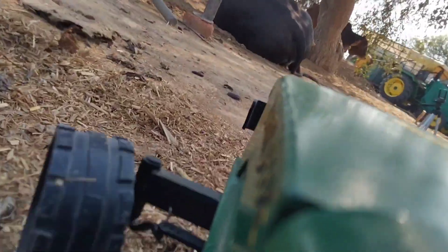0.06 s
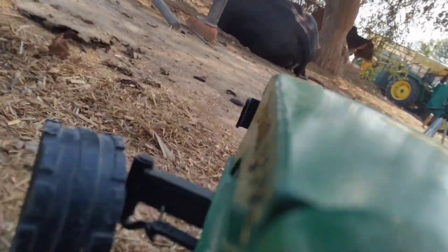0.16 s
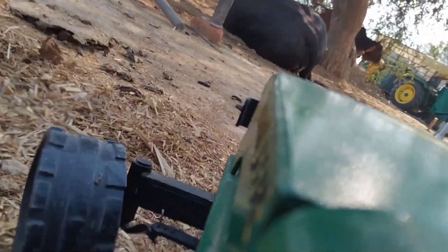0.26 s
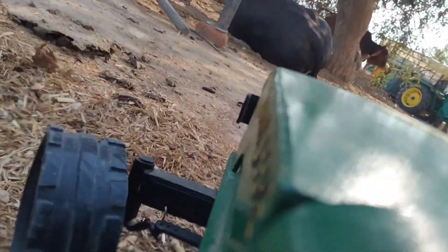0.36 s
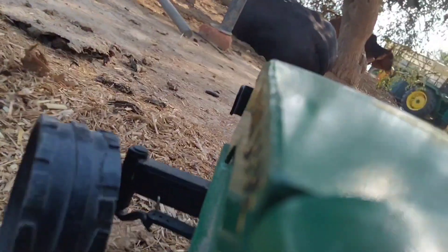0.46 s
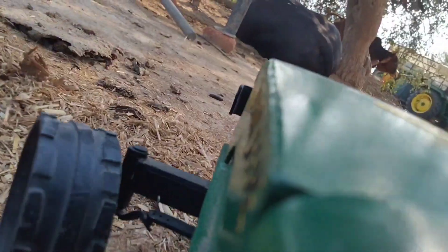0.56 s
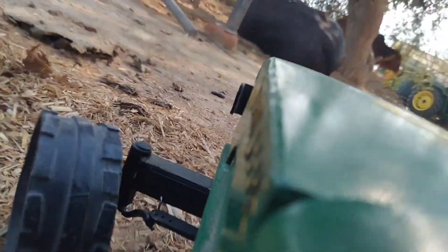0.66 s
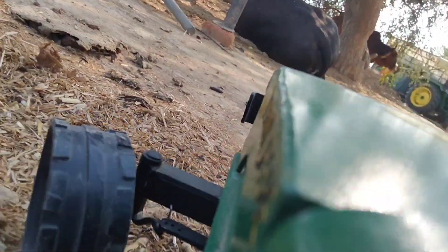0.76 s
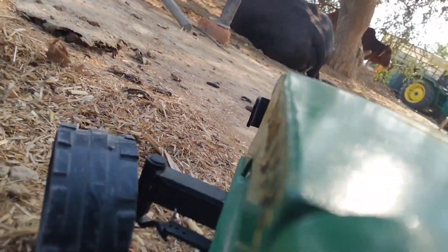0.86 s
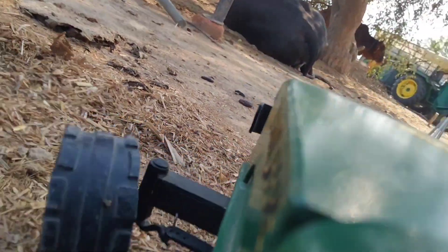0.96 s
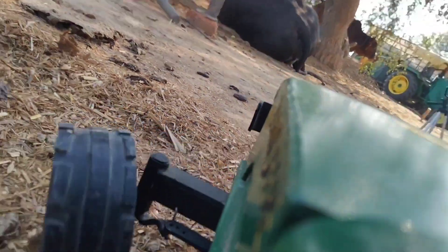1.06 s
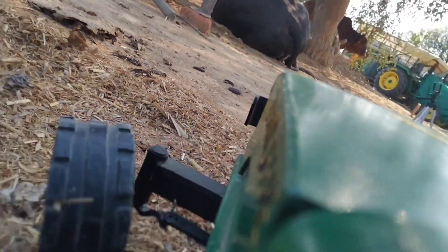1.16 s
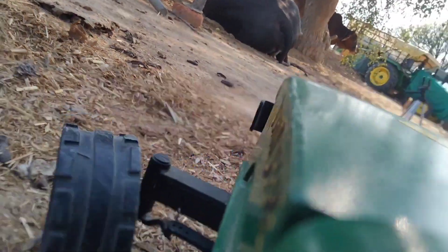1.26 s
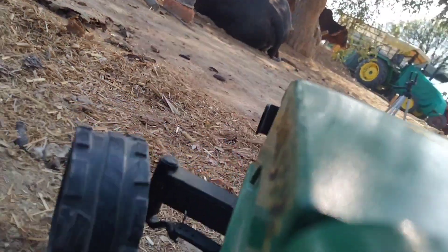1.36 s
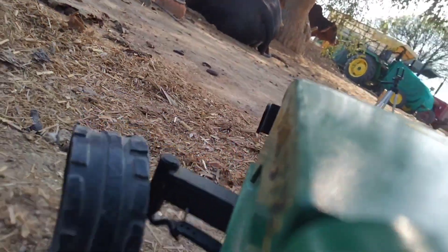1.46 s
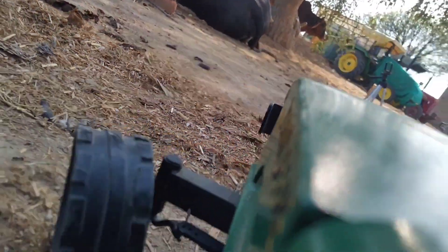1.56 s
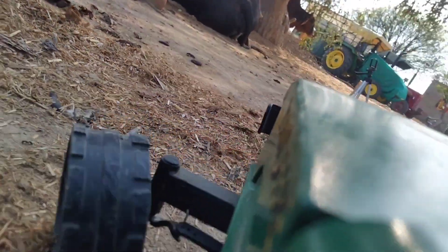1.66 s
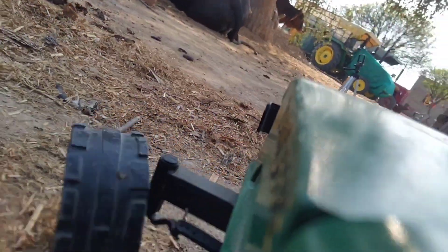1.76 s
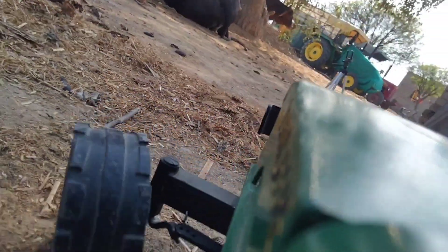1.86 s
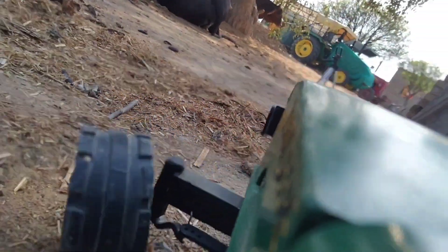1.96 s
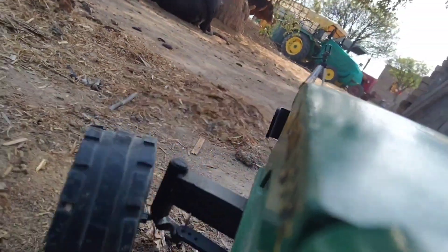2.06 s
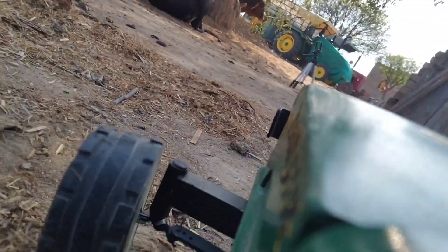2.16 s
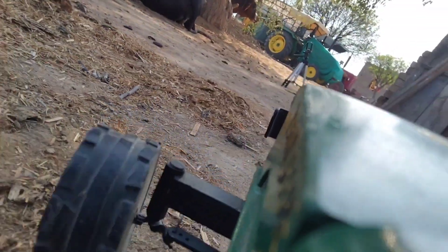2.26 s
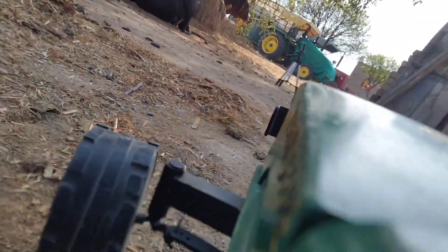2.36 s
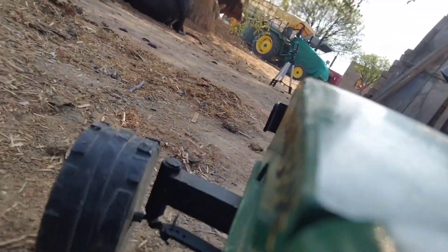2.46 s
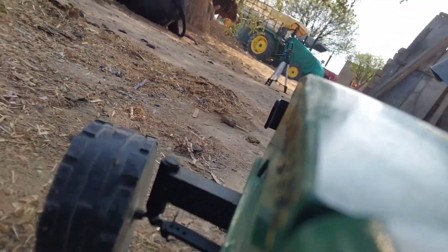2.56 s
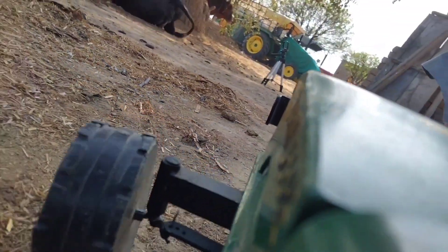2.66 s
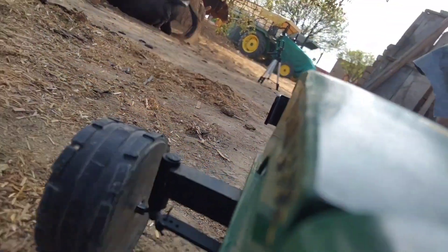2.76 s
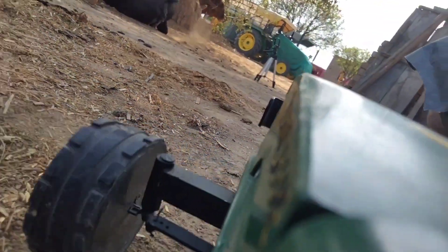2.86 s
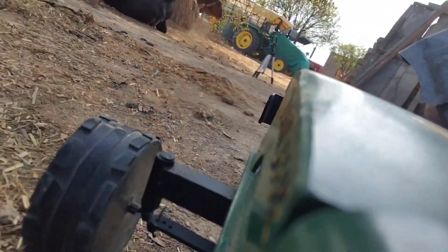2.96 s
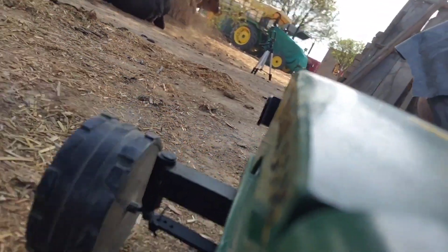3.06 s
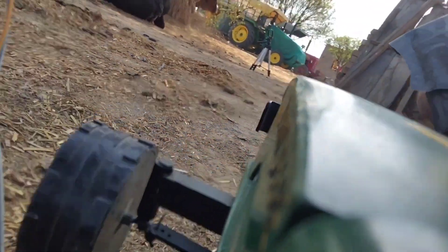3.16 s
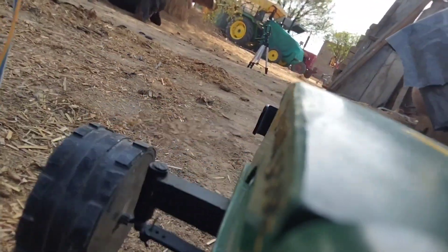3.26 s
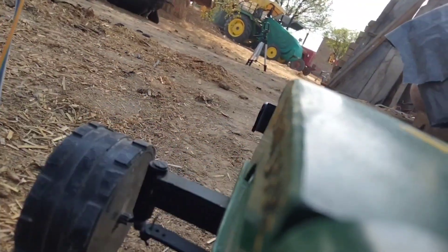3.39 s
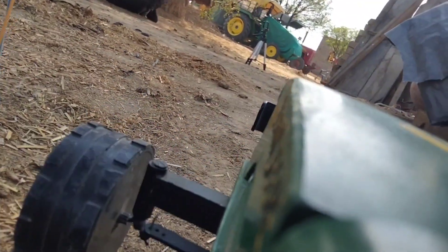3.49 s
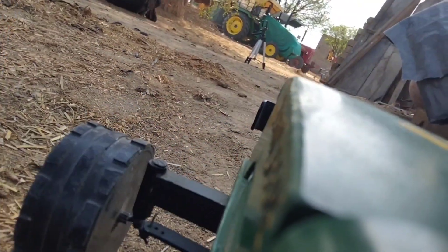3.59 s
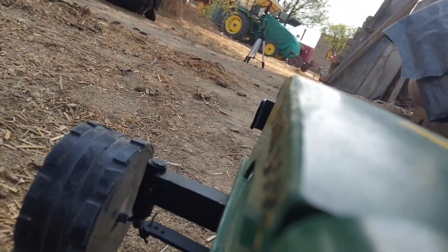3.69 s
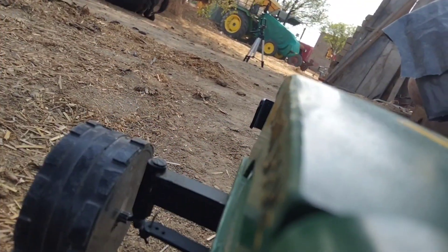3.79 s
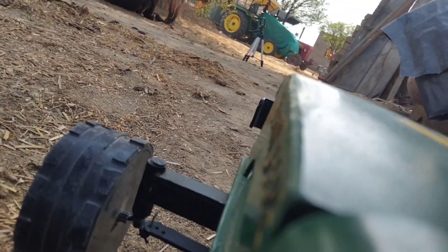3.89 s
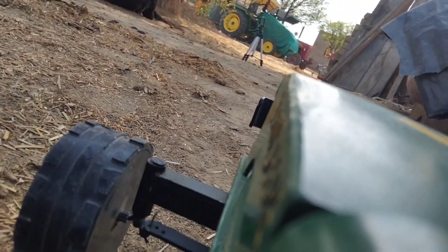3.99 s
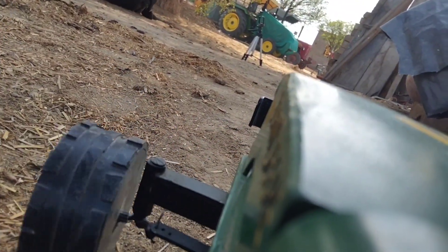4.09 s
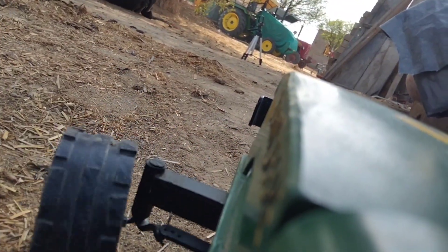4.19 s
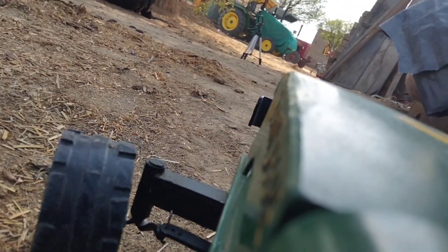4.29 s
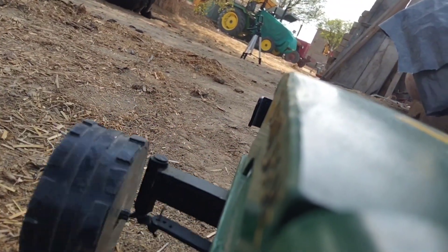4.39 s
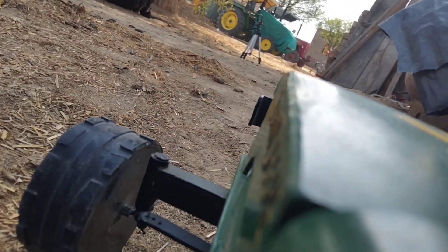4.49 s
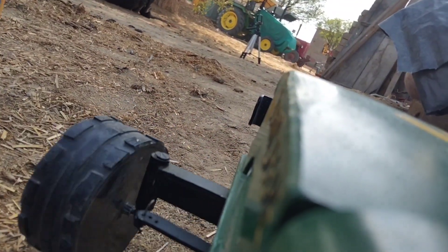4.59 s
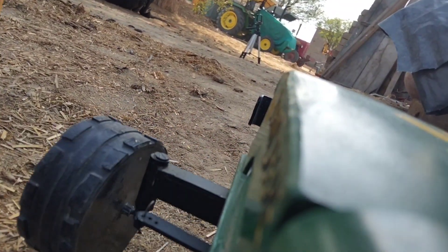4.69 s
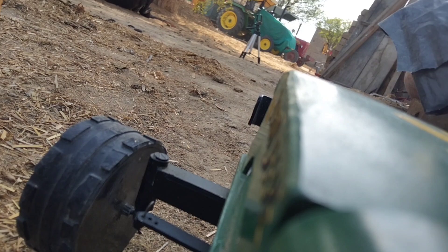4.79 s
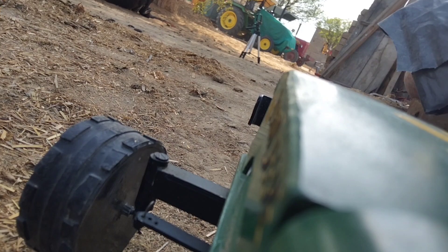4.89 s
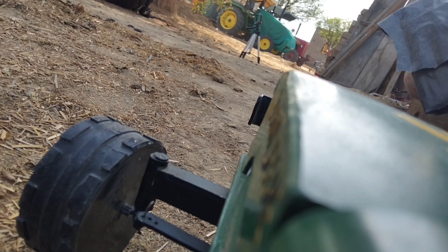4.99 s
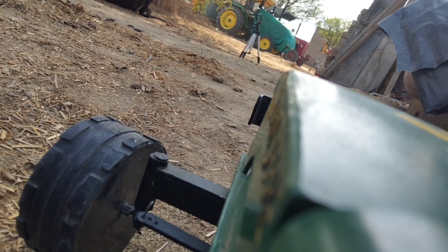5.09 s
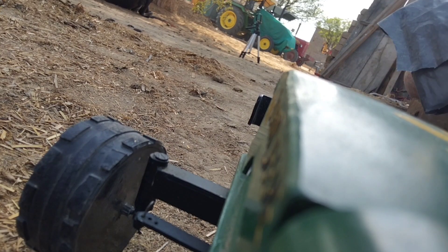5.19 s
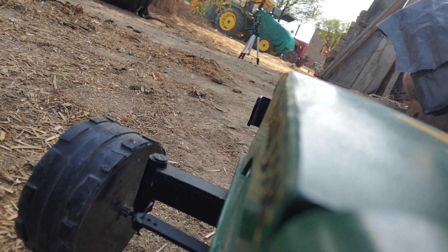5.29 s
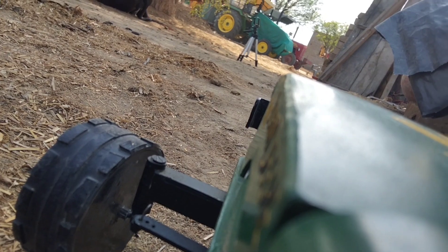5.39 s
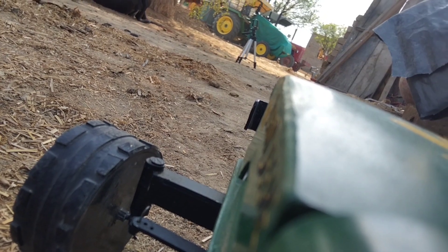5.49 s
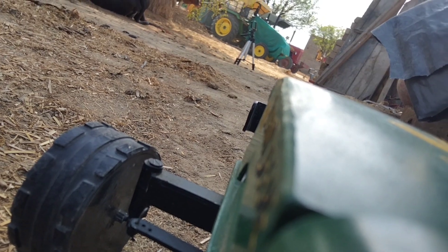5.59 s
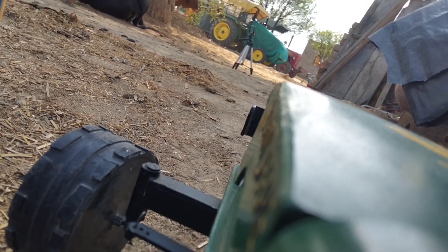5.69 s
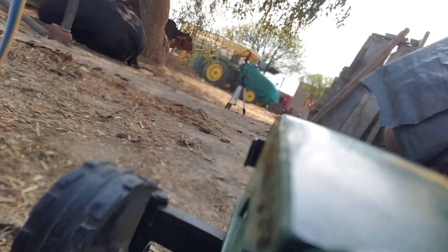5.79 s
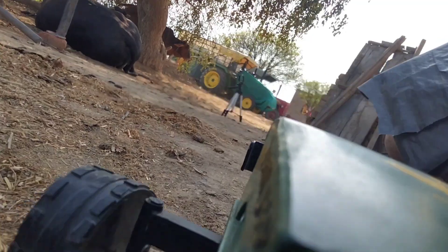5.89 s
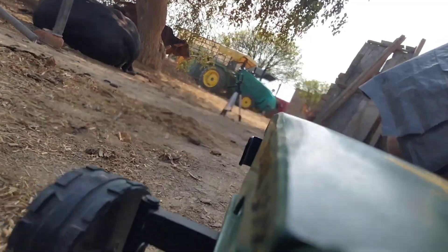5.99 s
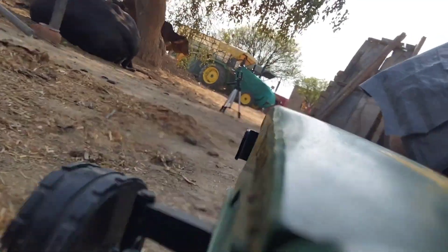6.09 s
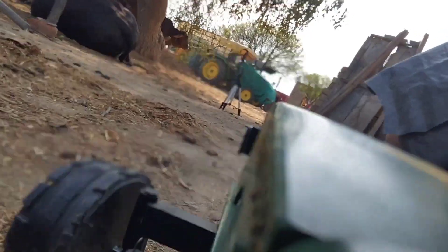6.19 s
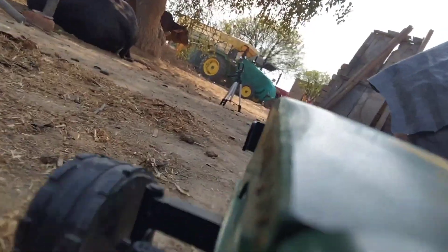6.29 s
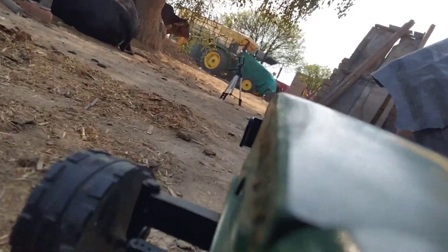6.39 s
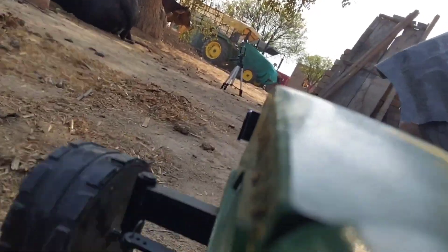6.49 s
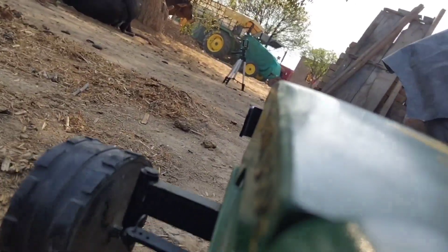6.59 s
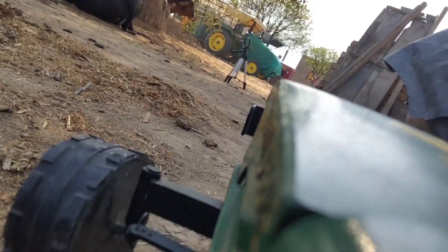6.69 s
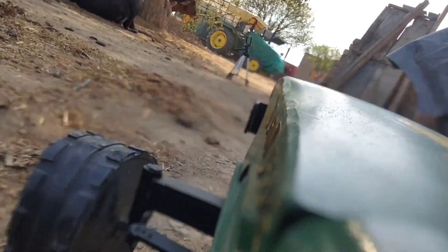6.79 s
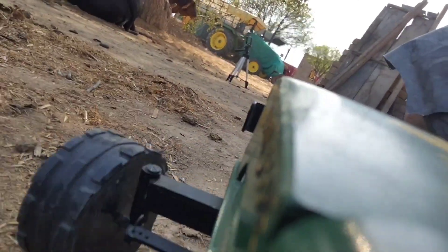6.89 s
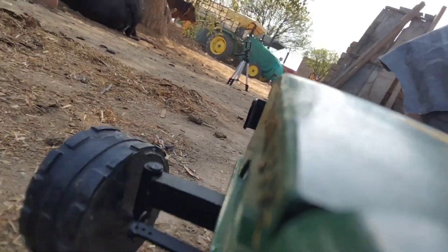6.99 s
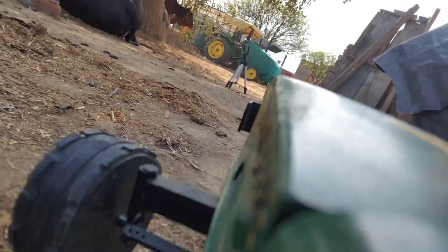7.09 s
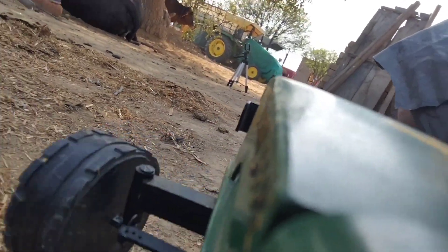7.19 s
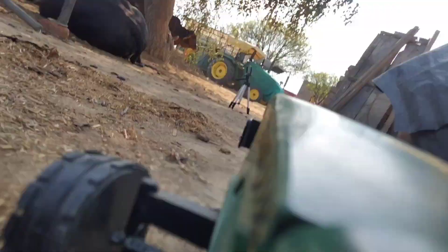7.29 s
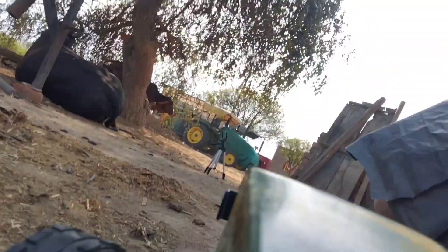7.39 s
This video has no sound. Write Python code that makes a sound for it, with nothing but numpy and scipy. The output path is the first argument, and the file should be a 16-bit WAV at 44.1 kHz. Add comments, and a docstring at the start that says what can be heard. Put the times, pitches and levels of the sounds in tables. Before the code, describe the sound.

Close up, a toy tractor's plastic gears whine, stop and start again, between switch clicks and the thin rasp of its steering motor.

```python
"""A toy tractor drives about a quiet farmyard with a phone riding on it. Its drive motor whines and
grinds through a plastic gearbox as it pulls, coasts and reverses. The brushes of a small steering
motor rasp in short strokes and one long one. Relays (electric switches) click at starts and stops.
In a pause, far birds chirp and something creaks once over the soft hush of the air."""
import sys
import numpy as np
from scipy.fft import rfft, irfft, next_fast_len
from scipy.io import wavfile
from scipy.ndimage import uniform_filter1d

SR = 44100
rng = np.random.default_rng(int(sys.argv[2]) if len(sys.argv) > 2 else 0)


def materialize(psi):
    """Save the field psi as 16-bit PCM at rate SR to the path in sys.argv[1].

    A 1-D psi becomes a single channel; in a 2-D psi each row is a channel.
    """
    bounded = np.clip(np.atleast_2d(psi).T, -1, 1)
    quanta = np.round(bounded * 32767).astype(np.int16)
    wavfile.write(sys.argv[1], SR, quanta)


N = 328545

# Drive motor, one list a run: t/s, shaft speed/(turns per s), load on the wheels (0-1)
DRIVE_MOTION = [
    [(0.0, 281, 1), (0.152, 284, 0.97), (0.19, 265, 0.6), (0.334, 288, 0.88), (0.44, 280, 0.9),
     (.5, 200, 0.2), (.59, 160, 0)],
    [(0.7, 227, 0.42), (.76, 243, 0), (0.85, 278, 0), (0.99, 268.3, 0), (1.0, 281, 0.49), (1.138, 272, 0),
     (1.19, 270, 0), (1.205, 284, 0.6), (1.355, 284, 0.7), (1.52, 275, 0.43), (1.555, 280, 0.7),
     (1.756, 277.5, 0.35), (2.04, 284, 0.4), (2.28, 287, 0.7)],
    [(2.31, 293, 1), (2.898, 307, 0.99), (3.05, 283, 1), (3.16, 211, 0.42)],
    [(5.82, 215, 0.6), (5.862, 266, 0.9), (6.03, 288, 1), (6.085, 266, 0.95), (6.2, 272, 1), (6.35, 288, 1),
     (6.43, 284, 0.7), (6.52, 279, 0.6)],
    [(6.88, 225, 0.1), (6.978, 272, 0.05), (7.0, 290.5, 0.92), (7.094, 305, 0.77), (7.13, 294.7, 0.44),
     (7.162, 250, 0.8), (7.246, 209, .6), (7.27, 233, 0.94), (7.34, 185, 1)],
    [(7.37, 190, 0.8), (7.45, 224, 0.68)],
]
# Backing up: from t/s, to t/s
REVERSING = [(2.29, 3.1), (6.995, 7.14)]
# Runs: power on t/s, power off t/s, wheels stop t/s, base level/dB of first grind, last grind, whine
DRIVE_RUNS = [(-.1, .46, .68, -36, -33, -31), (.688, 2.284, 2.3, -36.5, -35.5, -33),
              (2.308, 3.04, 3.38, -37.5, -38, -36.5), (5.793, 6.525, 6.753, -34.5, -33.5, -31.5),
              (6.858, 7.135, 7.4, -32.5, -40, -35), (7.358, 7.6, 8, -43, -20.5, -34)]
# The gears catch as the tractor lurches: t/s, level/dB of grind, whine and rumble, half length/s
LURCHES = [(0.172, -46.5, -47.5, -38.5, 0.019), (0.518, -42.5, -36, -45.5, 0.017),
           (0.56, -49, -36.5, -44.5, 0.013), (3.13, -45.5, -66, -44, 0.052),
           (3.188, -33.5, -35.5, -38.5, 0.0078), (3.228, -35.5, -44, -41, 0.02886),
           (3.281, -42.5, -37, -37, 0.014), (3.322, -51.5, -58.5, -42, 0.023),
           (3.396, -92, -82, -67, 0.0078), (5.823, -44.5, -53.5, -34.5, .02),
           (6.54, -33, -41, -45.5, 0.018), (6.643, -48.5, -40, -45.5, 0.014),
           (6.709, -56, -57.5, -48.5, .012), (7.204, -37.5, -35.5, -41, 0.041),
           (7.316, -43.5, -42.5, -48, 0.037), (7.386, -46, -60.5, -36, 0.014)]
# The gears go slack and the whine drops out: t/s, depth/dB, half length/s
GEAR_SLACK = [(2.381, 10, 0.006), (2.435, 13, 0.0089), (2.593, 11.5, 0.015), (2.63, 8, 0.012),
              (2.732, 19, 0.014), (2.82, 17.5, 0.017), (2.872, 14, 0.015), (0.336, 9.5, 0.0096)]
# Whine tones, or "orders": multiple of the shaft speed, forward level/dB, reverse level/dB
SHAFT_ORDERS = [(1.5, -13, -4.5), (3, -4.5, 2.5), (4, -10, -5.5), (6, -4, -6.5), (7, -4.5, -9.5),
                (8, -9, -6), (9, -1, -7), (12, 16, -11)]
# Rough bands of noise going forward: multiple of the shaft speed, level/dB over the whine
BUZZ_BANDS = [(7, -9), (9, -12), (12, -7), (15, -9), (18, -12)]
# Where the gearbox shell rings: f/Hz, width/Hz, level/dB
SHELL_RINGS = [(1795, 140, 11.5), (2940, 86, -10.5), (4150, 140, -19.5)]
# Tone colours of the grinding teeth, the rumbling body and the gear hiss: f/Hz, level/dB
GRIND_COLOUR = [(700, -56), (1100, -19.5), (2100, -9.5), (2500, -12.5), (2700, -12), (3200, -7.5),
                (3950, -14), (4200, -13), (4750, -15.5), (5600, -27), (7500, -48.5)]
RUMBLE_COLOUR = [(18, -56.5), (30, -10), (157, -10), (348, -4), (655, -9.5), (835, -5), (1450, -9.5),
                 (1880, -40)]
HISS_COLOUR = [(2650, -38), (4500, -14.5), (5080, 1), (5700, -7), (8420, -0.5), (11800, -8), (16000, -16)]
# Short steering strokes: power on t/s, peak t/s, power off t/s,
# rasp level/dB at the peak, rasp level/dB at power off, top rate/(teeth per s)
SHORT_STROKES = [(-.1, .055, 0.083, -25, -30.5, 1770), (2.075, 2.14, 2.39, -22.5, -50, 2880),
                 (2.735, 2.762, 2.88, -29.5, -67, 1380), (2.862, 2.885, 2.81, -27, -36, 1300),
                 (2.93, 2.988, 3.7, -38.5, -81, 1490), (3.628, 3.654, 3.66, -27, -27.5, 1520),
                 (3.817, 3.84, 3.86, -30, -31, 1820), (4.67, 4.755, 4.822, -42.5, -56.5, 900)]
# The long stroke, from one side to the other: t/s, rasp level/dB, rate/(teeth per s)
LONG_STROKE = [(4.148, -30, 1780), (4.166, -24.5, 1710), (4.22, -25, 1740), (4.27, -24, 1790),
               (4.325, -23.5, 2080), (4.374, -27.5, 2095), (4.41, -24, 2130), (4.456, -24.5, 2120),
               (4.5, -26.5, 1930), (4.56, -28, 1400), (4.61, -27, 1225), (4.647, -29, 1300)]
# Tone colours of short strokes against the tyres' grip, the long stroke and its casing: f/Hz, level/dB
SHORT_COLOUR = [(250, -28), (600, -34), (1240, -26), (3680, -17), (4300, -19), (5600, -5.5), (7000, -9.5),
                (8600, -11.5), (9600, -4.5), (10600, -15.5), (16000, -16.5)]
LONG_COLOUR = [(300, -31), (1080, -25), (1800, -22), (2500, -23.5), (3700, -10), (4250, -15.5),
               (5280, -6.5), (5900, -12), (8300, -1.5), (10700, -11), (14200, -11), (16000, -21)]
CASING_COLOUR = [(500, -15), (1800, -7), (4200, -6.5), (5300, -.5), (9000, -1), (14000, -8)]
# How alike each motor sounds at the two microphones: f/Hz, likeness (0-1)
DRIVE_LIKENESS = [(30, 0.8), (100, 0.7), (1700, 0.64), (12000, 0)]
STEER_LIKENESS = [(300, 0.4), (12000, 0.46)]
# How much louder it is on the left: f/Hz, level/dB
DRIVE_BALANCE = [(60, -0.5), (300, 9.5), (650, -1), (1700, 5), (3500, 5.5), (8100, -11.5), (15000, 3.5)]
STEER_BALANCE = [(1300, 0.5), (4400, -1.5), (8100, -12), (15000, -4.5)]
# How far the left wave leads (the drive rocks the body in the bass): f/Hz, phase/rad
DRIVE_LEAD = [(0, 3), (150, 2.3), (450, 1.2), (1700, 0.9), (2300, 3.4), (16000, 7.55)]
STEER_LEAD = [(0, 0.023), (16000, 0.0068)]
# Tone colour of still air: f/Hz, level/dB
AIR_COLOUR = [(25, -4), (110, -2), (300, -7), (700, -15), (12000, -22)]
# Relay clicks: t/s, level/dB, body knock level/dB relative to the usual knock
RELAY_CLICKS = [(0.457, -7, -37), (0.6821, -5.5, -47), (0.6929, -21.5, 0.5), (0.766, -13, -15),
                (2.0633, -12, -25), (2.282, -9.5, -26), (2.726, -10, -36), (2.9633, -3.5, -32),
                (3.148, -6, -27), (3.2844, -18.5, -9.5), (3.4823, -42.5, -23), (3.6223, -15.5, -30.5),
                (3.8106, -9, -54), (4.1393, -18.5, -43), (4.646, -26, -25), (5.791, -11.5, -39),
                (6.168, -15.5, -32), (6.5212, -6.5, -29.5), (6.858, -14, -38.5), (6.8812, -10, -12),
                (7.1272, -9, -32), (7.3443, -8.5, -27)]
# Where a relay's case rings: f/Hz, level/dB
RELAY_RINGS = [(3100, -13), (5000, -9), (5900, -8), (7600, 1.5), (8600, -1.5), (9500, 2.5), (11200, -5.5),
               (14200, -9.5)]
# Far chirps: t/s, length/s, first f/Hz, last f/Hz, level/dB
BIRD_CHIRPS = [(4.915, .185, 3700, 3290, -78), (5.74, .035, 3790, 3660, -73)]
# Tone colour of the creak: f/Hz, level/dB
CREAK_COLOUR = [(400, -10), (1300, -12.5), (2900, 0), (4300, -14), (6000, -45)]

CRUISE = 280.5  # usual shaft speed, turns per s
MESH_ORDER = 6  # gear teeth meet ("mesh") this many times a turn
TIME = np.arange(N) / SR


def amp(db):
    """Turn decibels into a gain."""
    return 10 ** (np.asarray(db) / 20)


def unit(x):
    """Scale a signal to an average power of 1."""
    return x / np.sqrt(np.mean(np.abs(x) ** 2) + 1e-20)


def along(points, hz):
    """Read between (f/Hz, value) points on a pitch scale."""
    f, values = np.transpose(points)
    return np.interp(np.log(hz + 1), np.log(f + 1), values)


def curves(rows):
    """Join timed rows into one smooth line for each column."""
    times, *columns = np.transpose(rows)
    return [np.interp(TIME, times, column) for column in columns]


def latest(rows):
    """For each sample, the columns of the last event begun (or of the first, before any begins)."""
    rows = np.array(rows)
    return rows[np.clip(np.searchsorted(rows[:, 0], TIME) - 1, 0, None)].T


def since(start):
    """Seconds gone by since start; 0 before it."""
    return np.clip(TIME - start, 0, None)


def smooth(x):
    """Soften sudden steps over about 4 ms."""
    return uniform_filter1d(x, size=180, mode="nearest")


def inside(spans):
    """1 inside the (from, to) spans, 0 outside, with soft edges."""
    return smooth(1.0 * sum((TIME >= a) & (TIME <= b) for a, b in spans))


def wobble(rate, count=2):
    """Random curves that head for a new value rate times a second."""
    knots = rng.standard_normal((count, N // 40))
    return np.array([np.interp(TIME * rate, np.arange(len(k)), k) for k in knots])


def filtered(x, response):
    """Change the strength and phase of each frequency by response(hz)."""
    size = next_fast_len(N + 8192)
    return irfft(rfft(x, size) * response(np.fft.rfftfreq(size, 1 / SR)), size)[..., :N]


def white():
    """Two unrelated white noises."""
    return rng.standard_normal((2, N))


def noise(colour, shape=1):
    """Two noises that pulse with the same shape and share a tone colour."""
    return unit(filtered(shape * white(), lambda hz: amp(along(colour, hz))))


def resonance(hz, centre, width):
    """The response of something that rings near one frequency."""
    return 1j * hz * width / (centre ** 2 - hz ** 2 + 1j * hz * width)


def microphones(pair, likeness, balance, lead):
    """A sound takes different paths to the two microphones, so it arrives only partly alike."""
    angle = lambda hz: np.arccos(np.clip(along(likeness, hz), 0, 1)) / 2
    mid, side = filtered(pair, lambda hz: np.array([np.cos(angle(hz)), np.sin(angle(hz))]))
    phase = lambda hz: np.interp(hz, *np.transpose(lead))
    tilt = lambda hz: amp(along(balance, hz) / 2) * np.exp(.5j * phase(hz))
    return filtered(np.array([mid + side, mid - side]), lambda hz: np.array([tilt(hz), 1 / tilt(hz)]))


def drive_levels(speed):
    """Grind, whine and rumble-over-grind in dB as the gears catch, pull, coast, stop and lurch."""
    coast_db_per_s, stop_db_per_s, whine_db_per_octave = 74, 499.5, 14.5
    on, off, stop, first_db, last_db, whine_db = latest(DRIVE_RUNS)
    unloaded = 1 - np.exp(-since(off) / .0087)
    catch_db = 7.5 * np.exp(-(TIME - on) / .017)  # the gears take up their play at power on
    fall_db = catch_db + coast_db_per_s * since(off) + stop_db_per_s * since(stop)
    pull_db = first_db + (last_db - first_db) * np.clip((TIME - on) / (off - on), 0, 1)
    grind = amp(pull_db - 5 * unloaded - fall_db)
    whine = amp(whine_db + whine_db_per_octave * np.log2(speed / CRUISE) - 33 * unloaded - fall_db)
    rumble = grind * amp(-3 + unloaded)
    levels = np.array([grind, whine, rumble]) + 1e-9
    for when, *db, half in LURCHES:
        levels = levels + amp(db)[:, None] * np.exp(-((TIME - when) / half) ** 2)
    grind_db, whine_db, rumble_db = 20 * np.log10(levels)
    return grind_db, whine_db, rumble_db - grind_db


def shell(hz):
    """The plastic gearbox shell favours the frequencies at which it rings."""
    return sum(amp(db) * resonance(hz, centre, width) for centre, width, db in SHELL_RINGS)


def gear_whine(turns, speed, load, reverse):
    """Tones follow the shaft and swell near the shell's rings; uneven teeth add bands of noise."""
    spin_up = np.clip(np.log2(CRUISE / speed), 0, 1) * (TIME < latest(DRIVE_RUNS)[1])
    faint_mesh_db = -33.5 * spin_up  # under power but below cruising speed
    # Load moves the whine from order 7 to the mesh and damps its octave; order 9 growls at spin-up.
    lift_db = {MESH_ORDER: 7 * load + faint_mesh_db, 7: -7 * load,
               9: 18.5 * spin_up, 2 * MESH_ORDER: -14 * load}
    weak_order = (6.4, -16, -13.5)
    tones, sway = 0, .4 * wobble(70)
    for order, forward_db, reverse_db in [*SHAFT_ORDERS, weak_order]:
        # Each order has its own unsteady path through the body.
        shake_db = {MESH_ORDER: 1.5, 3: 1.2}.get(order, 3.1) * wobble(90)
        db = forward_db + reverse * (reverse_db - forward_db) + lift_db.get(order, 0) + shake_db
        high = order > 9  # high orders need speed, and load roughens them
        db = db + high * 40.5 * np.log2(speed / CRUISE)
        blur = high * (.9 + .7 * load) * wobble(160, count=1)
        phase = 2 * np.pi * order * turns + sway * (order / MESH_ORDER) ** 1.8 + blur
        tones = tones + amp(db) * np.sin(phase)
    tones = filtered(tones, lambda hz: .87 / (1 + (hz / 2500) ** 4) + .45 * shell(hz))

    def band(order, width_hz):
        """A narrow band of noise around one order."""
        return sum(wobble(width_hz, count=1) * np.sin(2 * np.pi * (order * turns + shift))
                   for shift in (0, .25))

    smear = amp(-.5 + faint_mesh_db) * band(MESH_ORDER, 130)
    buzz = (1 - reverse) * sum(amp(db) * band(order, 109.8) for order, db in BUZZ_BANDS)
    return amp(-3) * tones + smear + buzz


def body_boom():
    """Uneven knocks make the hollow body boom."""
    knocks = amp(8 * wobble(45, count=1)) * white()
    return unit(filtered(knocks, lambda hz: resonance(hz, centre=355, width=70)))


def drive_motor():
    """The gears whine, grind and ring their shell; a slower, uneven gear wheel makes them throb."""
    speed, load = curves(np.concatenate(DRIVE_MOTION))
    reverse = inside(REVERSING)
    grind_db, whine_db, rumble_db = drive_levels(speed)
    slack_db = sum(db * np.exp(-((TIME - when) / half) ** 2) for when, db, half in GEAR_SLACK)
    turns = np.cumsum(speed * (1 + .00678 * wobble(40, count=1)[0])) / SR
    wheel_turns = turns / 7 + .45 * wobble(18, count=1)[0]
    throb = np.cos(2 * np.pi * wheel_turns) + 1.2 * wobble(130, count=1)[0]
    pulses = 1 + .5 * np.cos(2 * np.pi * 3 * turns)  # three magnet poles pass each turn
    tones = gear_whine(turns, speed, load, reverse)
    ring = unit(filtered(pulses * white(), lambda hz: shell(hz) ** 2))
    ring *= amp(-5 + 6.3 * load + 8.1 * np.log2(speed / CRUISE))
    whine = amp(whine_db - slack_db + 1.6 * load * throb) * (tones + ring)
    crunch = amp(5 * reverse * wobble(90, count=1))  # in reverse the teeth bite unevenly
    grind = amp(3 + .7 * throb) * noise(GRIND_COLOUR, pulses * crunch)
    rumble = amp(rumble_db + .69 * wobble(25)) * noise(RUMBLE_COLOUR, amp(2.2 * wobble(8, count=1)))
    hiss_db = -1.5 + 1.6 * reverse + .11 * np.clip(-35 - grind_db, 0, 14) + .51 * throb
    hiss = amp(hiss_db) * noise(HISS_COLOUR, pulses * amp(1.7 * wobble(500, count=1)))
    boom = amp(-10.5) * load * (1 - reverse) * body_boom()
    sound = whine + amp(grind_db - .17 * slack_db) * (grind + rumble + hiss + boom)
    return microphones(sound, DRIVE_LIKENESS, DRIVE_BALANCE, DRIVE_LEAD)


def steering_strokes():
    """Rasp level in dB, gear teeth per second, and a gate that is 1 around the long stroke."""
    release_db_per_s, slow_teeth_per_s = 945, 1200
    on, peak, off, peak_db, off_db, top_rate = latest(SHORT_STROKES)
    rising_db = peak_db - 6.5 * (peak - TIME) / (peak - on)
    falling_db = peak_db + (off_db - peak_db) * np.clip((TIME - peak) / (off - peak), 0, 1)
    short_db = np.where(TIME < peak, rising_db, falling_db) - release_db_per_s * since(off)
    pace = np.exp(-(since(peak - .025) / .045) ** 2)  # the gears bog down from just before the peak
    short_rate = slow_teeth_per_s + (top_rate - slow_teeth_per_s) * pace
    start, end = LONG_STROKE[0][0], LONG_STROKE[-1][0]
    long_db, long_rate = curves(LONG_STROKE)
    long_db = long_db - release_db_per_s * since(end)
    is_long = (TIME > start - .003) & (long_db > short_db)
    rasp_db = 20 * np.log10(smooth(amp(np.where(is_long, long_db, short_db))) + 1e-9)
    return rasp_db, np.where(is_long, long_rate, short_rate), inside([(start - .05, end + .25)])


def steering_motor():
    """Brushes rasp once per magnet pole, three teeth to a rasp; teeth and poles sing sliding tones."""
    rasp_db, tooth_rate, long = steering_strokes()
    unsteady = 1 + .012 * wobble(120, count=1)[0] + .014 * wobble(35, count=1)[0]
    teeth = np.cumsum(tooth_rate * unsteady) / SR
    bursts = np.exp(.5 * np.cos(2 * np.pi * teeth / 3)) * amp(3.7 * wobble(90, count=1))
    sway = .3 * wobble(150)
    sing = 0
    for k in range(2, 22):
        db = 3.5 * wobble(130) - 7 * (k % 3 > 0) * (2 - long)  # pole tones are weaker than tooth tones
        sing = sing + amp(db) * np.sin(2 * np.pi * k * teeth / 3 + k * .09 * wobble(300))
    # The sliding overtones are coloured more sharply than the rasp, so they sound bright and thin.
    long_sing = unit(filtered(sing, lambda hz: amp(2 * along(CASING_COLOUR, hz))))
    short_sing = unit(filtered(sing, lambda hz: amp(2 * along(SHORT_COLOUR, hz))))
    sing = long * long_sing + (1 - long) * short_sing
    # At top speed every second tooth hits harder, which growls.
    growl_db = -21 + 97.5 * np.log2(tooth_rate / 2000) + 5.12 * wobble(40)
    growl = amp(growl_db) * np.sin(np.pi * teeth + sway)
    tones = np.clip((rasp_db + 33) / 15, 0, 1) * (amp(6) * sing + long * growl)
    rasp = long * noise(LONG_COLOUR, bursts) + (1 - long) * noise(SHORT_COLOUR, bursts)
    return microphones(amp(rasp_db) * (rasp + tones), STEER_LIKENESS, STEER_BALANCE, STEER_LEAD)


def still_air():
    """The faint, gently wavering hush of the yard."""
    return amp(-70.5 + .86 * wobble(13)) * noise(AIR_COLOUR)


def relays():
    """A small metal arm strikes, bounces within a few ms, rings its case and knocks the toy's body."""
    ring_s, crack_s, knock_s = .0032, .002, .077  # time to fade by 60 dB
    out, t = np.zeros((2, N + SR)), np.arange(SR // 10) / SR
    for when, db, knock_db in RELAY_CLICKS:
        strikes = np.zeros(200)
        strike_db = np.array([-16, 1.5, -13, -6, -8]) + rng.normal(0, 5.6, size=5)
        strikes[[0, 40, 75, 110, 170]] = amp(strike_db)
        for channel, side_db in enumerate((-5, 5)):
            ring = sum(amp(level + rng.normal(0, 5.8) - 60 * t / ring_s)
                       * np.sin(2 * np.pi * (hz * t + rng.random())) for hz, level in RELAY_RINGS)
            crack = .5 * amp(-60 * t / crack_s) * np.gradient(rng.standard_normal(len(t)))
            knock = sum(np.sin(2 * np.pi * hz * rng.uniform(.9, 1.25) * t) for hz in (450, 1000, 1900))
            knock *= amp(knock_db - 8.5 - 60 * t / knock_s)
            click = np.convolve(ring + crack, strikes)[:len(t)]
            hit = click / np.abs(click).max() + knock
            out[channel, round(when * SR):][:len(t)] += amp(db + side_db) * hit
    return out[:, :N]


def birds():
    """Thin, fading chirps with an overtone; the pitch drops fast, then settles."""
    start, length, first_hz, last_hz, db = latest(BIRD_CHIRPS)
    done = np.clip((TIME - start) / length, 0, 1)
    cycles = np.cumsum(last_hz + (first_hz - last_hz) * (1 - done) ** 2) / SR
    gate = inside([(when, when + span) for when, span, *_ in BIRD_CHIRPS])
    level = gate * amp(db - 10 * done + 3.5 * wobble(90))
    return level * (np.sin(2 * np.pi * cycles) + 1.4 * np.sin(4 * np.pi * cycles))


def creak():
    """Perhaps the steering settling back: hoarse overtones sag as they fade, under a thin rasp."""
    start_s, rise_s, hold_s = 5.488, .021, .048
    pitch_hz, sag_hz_per_s, fade_db_per_s = 540, 1900, 232.5
    fading_s = since(start_s + hold_s)
    level = np.clip(since(start_s) / rise_s, 0, 1) ** 2 * amp(-51.5 - fade_db_per_s * fading_s)
    cycles = np.cumsum(pitch_hz - sag_hz_per_s * np.minimum(fading_s, .2)) / SR
    tones = sum(amp(2.4 * wobble(58)) * np.sin(2 * np.pi * k * cycles + 1.15 * wobble(140))
                for k in range(2, 9))
    hoarse = unit(filtered(tones + 3 * white(), lambda hz: amp(along(CREAK_COLOUR, hz))))
    rasp = amp(-.5) * noise([(3500, -21), (8200, 5), (10500, -16), (15000, -4)])
    return level * (hoarse + rasp)


def scene():
    """Add up the air, both motors, the relays, the creak and the birds."""
    return still_air() + drive_motor() + steering_motor() + relays() + creak() + birds()


def record(dry):
    """Soften the sharpest peaks of the clicks and rasps, and cut the very highest treble."""
    ceiling, silent_above_hz = .7, 16500
    soft = dry / (1 + np.abs(dry / ceiling) ** 4) ** (1 / 4)
    return filtered(soft, lambda hz: np.clip((silent_above_hz - hz) / 1000, 0, 1) ** 3)


dry = scene()
out = record(dry)
materialize(out)
```